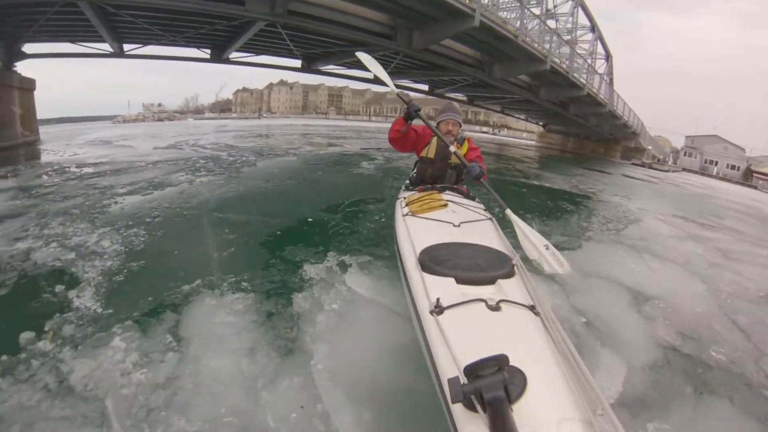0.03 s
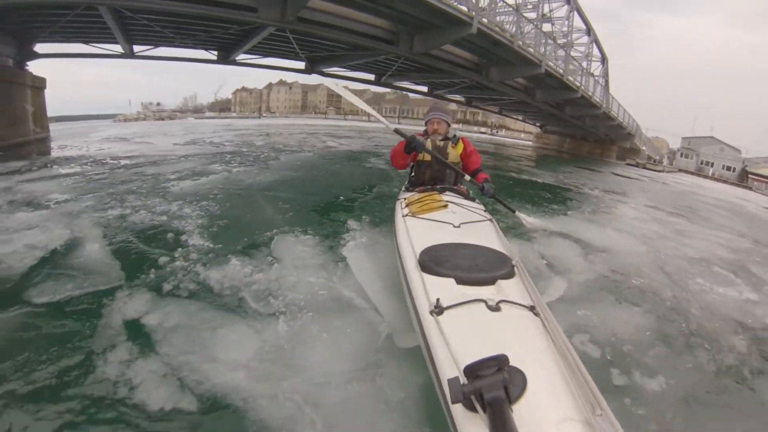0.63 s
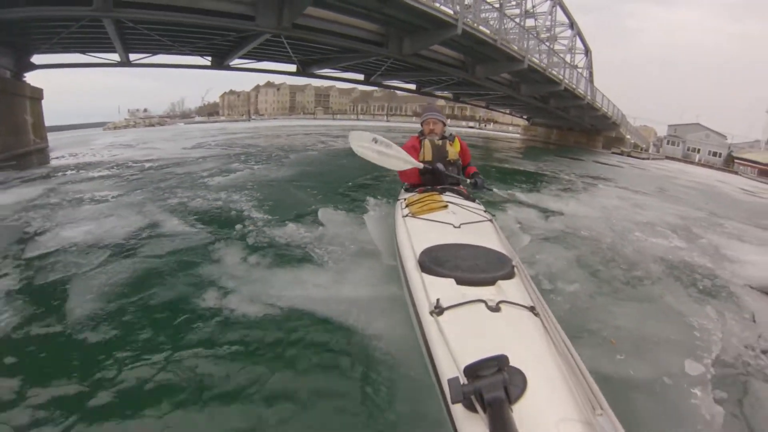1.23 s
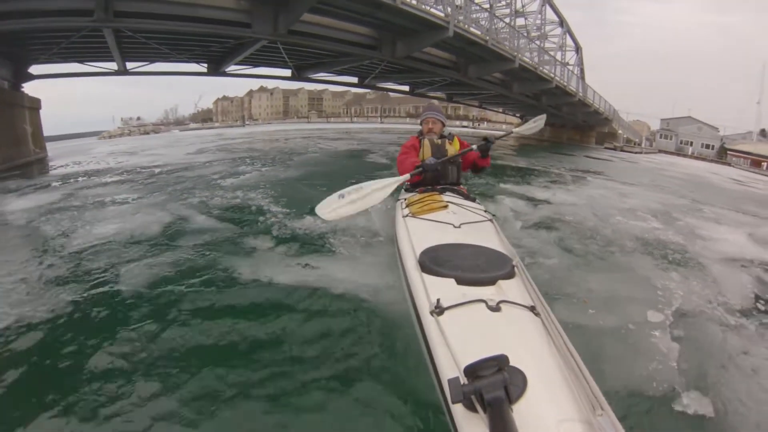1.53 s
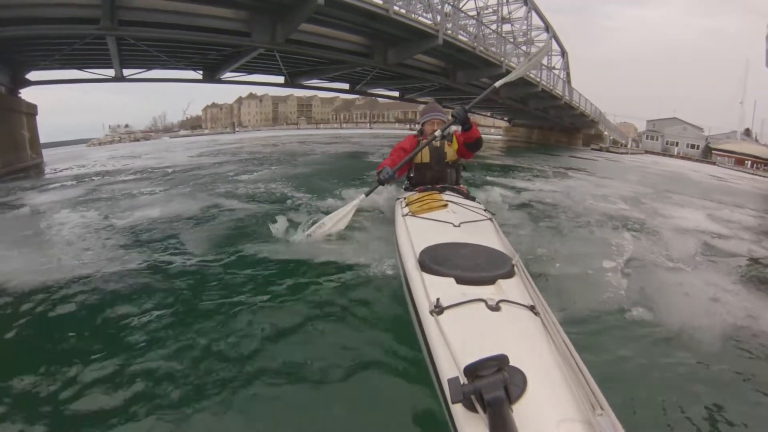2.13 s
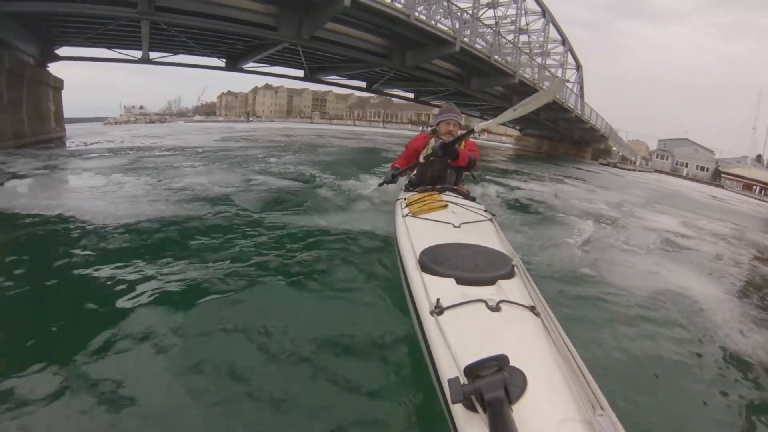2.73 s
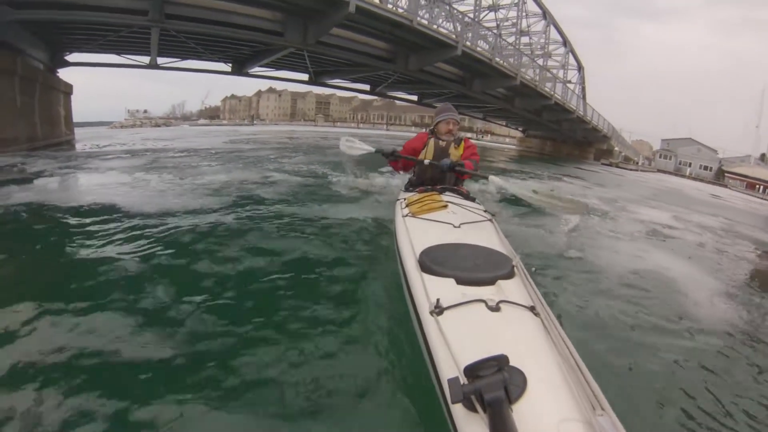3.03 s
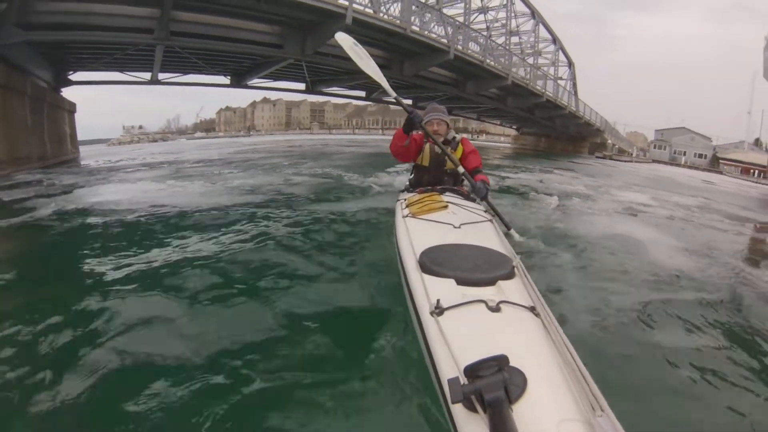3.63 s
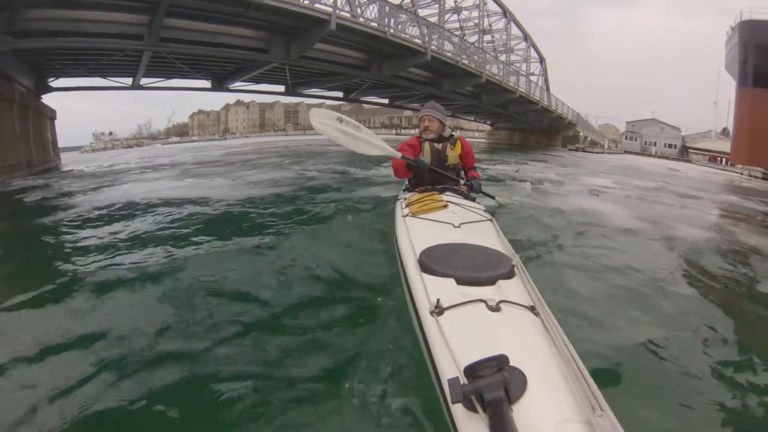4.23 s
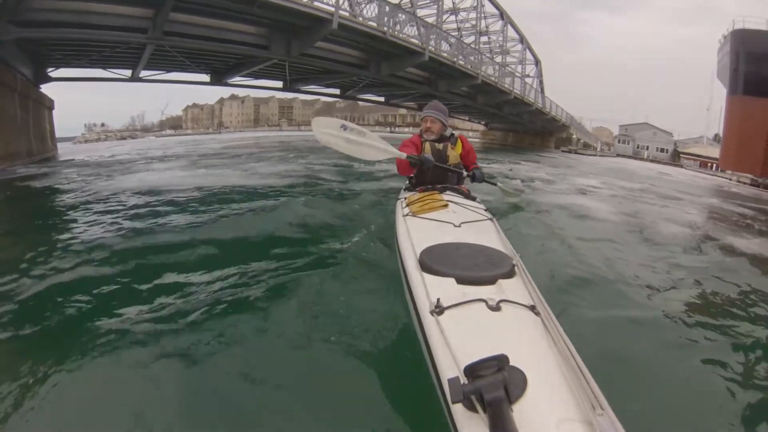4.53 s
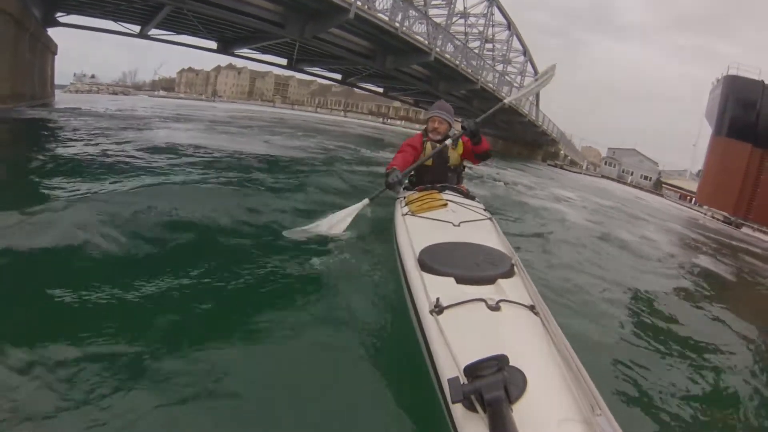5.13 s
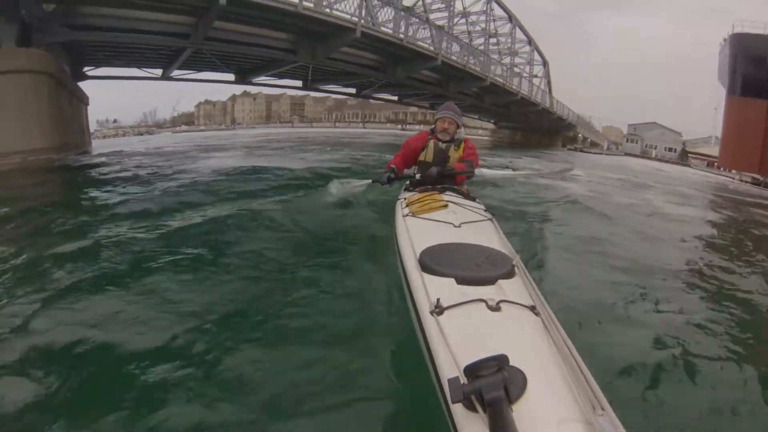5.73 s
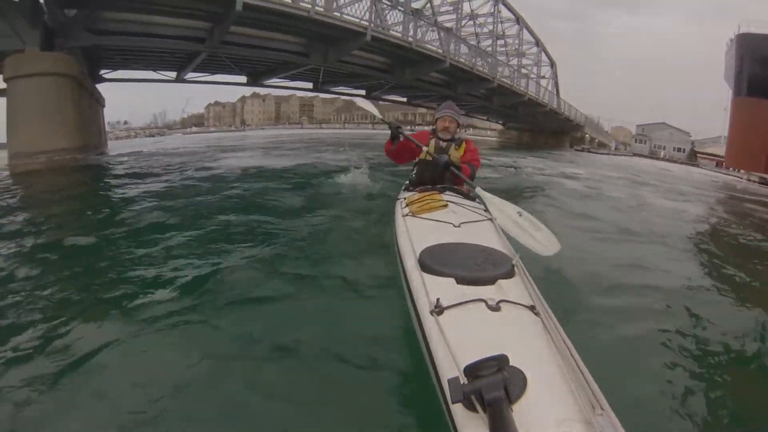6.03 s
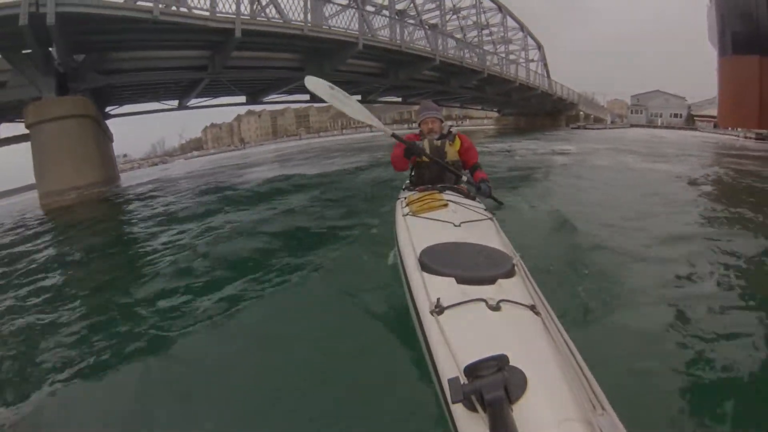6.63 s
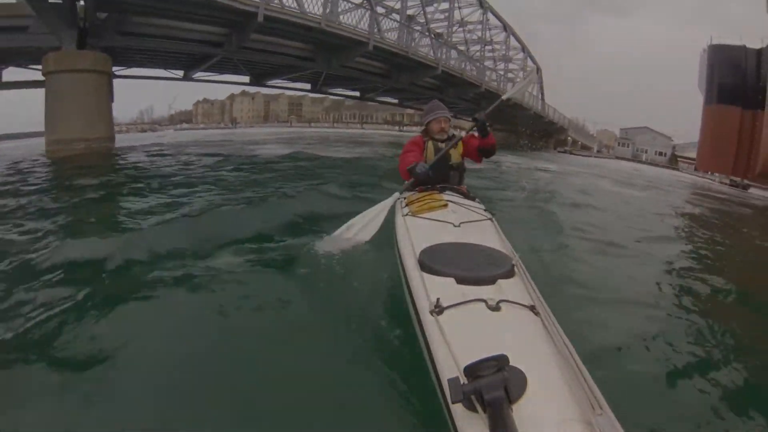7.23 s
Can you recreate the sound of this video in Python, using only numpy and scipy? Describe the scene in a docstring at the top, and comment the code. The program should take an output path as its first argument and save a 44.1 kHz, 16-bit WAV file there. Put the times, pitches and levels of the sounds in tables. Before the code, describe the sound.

A kayak grinds and crunches through slushy ice, then glides into open water with gulps, light splashes and distant gulls.

```python
"""A sea kayak grinds through slush and thin ice under a bridge, then glides into open water.
We ride with a camera on the bow: ice grains, knocks and lapping water come up through the deck and
ring the hull, while the mount sways with a low rumble. Paddle strokes stir up fizz over a faint wash;
past the ice, bubbles gulp and drops patter. Gulls cry in the distance and echo under the bridge."""
import sys
import numpy as np
from scipy import signal
from scipy.fft import rfft, irfft
from scipy.io import wavfile
from scipy.ndimage import uniform_filter1d

SR = 44100
rng = np.random.default_rng(int(sys.argv[2]) if len(sys.argv) > 2 else 0)


def generate_wav(signal):
    """Clip the signal to [-1, 1] and save it as 16-bit WAV at the path in sys.argv[1]."""
    frames = np.transpose(np.atleast_2d(signal))
    scaled = np.clip(frames, -1, 1) * 32767
    pcm = np.round(scaled).astype(np.int16)
    wavfile.write(sys.argv[1], SR, pcm)


N = 329868
TIME = np.arange(N) / SR
FFT_SIZE = 2 ** 19
FREQ = np.maximum(np.arange(FFT_SIZE // 2 + 1) * SR / FFT_SIZE, 1)

# faders for the drag, easing as the ice thins: t/s, push/dB, slosh/dB, grind/dB
DRAG_FADERS = [(0, -35.5, -48.5, -43), (.22, -38, -58.5, -50.5), (.33, -36, -51.5, -47.5),
               (.55, -37.5, -52.5, -46.5), (.95, -34.5, -46.5, -50), (1.25, -40, -60, -57),
               (1.95, -42.5, -64.5, -62.5), (2.25, -43, -65, -58.5), (2.62, -43, -66.5, -65.5),
               (2.918, -38, -62, -60.5), (3.12, -50, -76, -75), (3.68, -49.5, -73.5, -73),
               (3.96, -39, -65.5, -64), (4.28, -47.5, -65.5, -70.5), (4.75, -53, -79, -74),
               (5.3, -55.5, -87, -83.5), (5.7, -67.5, -85.5, -80.5), (6.4, -72.5, -86.5, -76),
               (6.88, -63, -78, -82.5), (7.48, -79.5, -89, -82)]
# passing floes, later wavelets: peak t/s, half length/s, push boost/dB, slosh and grind boost/dB
DRAG_SWELLS = [(0.323, 0.029, 3, 4.5), (0.678, 0.049, 5, 6), (0.803, 0.037, 6, 10), (1.566, 0.018, 6, 2.5),
               (1.74, 0.048, 7, 2), (1.91, .03, 5, 1), (2.04, 0.027, 6, 6), (2.18, 0.027, 4.5, 1),
               (2.318, 0.051, 9, 3.5), (2.784, 0.054, 3.5, 2.5), (3.376, 0.025, 5, 4),
               (3.552, 0.063, 13, 11), (3.781, 0.043, 9, -4), (4.088, 0.047, 8.5, 1),
               (4.202, 0.027, 0.5, 6), (4.881, 0.035, 4, 6.5), (5.003, 0.021, 7, 4), (5.235, 0.16, 7, 6),
               (5.568, 0.033, 10, 7), (6.226, 0.027, 15.5, 4.5), (6.556, 0.041, 10, 13),
               (6.713, 0.087, 12.5, 17), (7.4, 0.039, 9.5, 6)]
# resonances of hull, deck and camera housing: f/Hz, width/Hz, level/dB
HULL_MODES = [(79.4, 28, -12), (106, 49, -9.5), (178.3, 31, 4.5), (234.4, 53, 0.5), (325.7, 65, -8),
              (374, 38, -8.5), (435.2, 50, -11.5), (666, 72, -23.5), (783, 99, -20), (854, 65, -17),
              (943, 57, -17), (1044.5, 72, -19.5), (1192, 160, -24), (1382.4, 118, -12), (1420, 45, -30.5),
              (1620, 59, -27), (1939, 89, -19), (2112, 138, -17), (2190, 64, -19.5), (2792, 160, -34),
              (3330, 300, -38.5), (4090, 370, -48.5), (5060, 460, -58.5), (6790, 1500, -59.5),
              (9300, 2500, -68)]
# upper-range bite of the push, sharper for hard floes than for waves: t/s, gain/dB
PUSH_BITE = [(0, 4.5), (1, 3), (1.9, -2.5), (2.8, -4.5), (3.6, -5), (4.3, 0.5), (5.2, 0.5), (7.48, 2.5)]
# fader for the rocking mount: t/s, level/dB
SWAY_FADER = [(0, -40), (.25, -42), (.37, -27.5), (.52, -43.5), (1.05, -30.5), (1.55, -46.5), (1.76, -34),
              (2.65, -45.5), (3.05, -43), (3.45, -56.5), (3.63, -36.5), (4.3, -54), (4.48, -36.5),
              (4.85, -64.5), (5.08, -39.5), (5.7, -68.5), (6.45, -64), (7.48, -56.5)]
# tone curve of the wash and hiss: f/Hz, relative level/dB
WASH_CURVE = [(30, 3), (100, -5), (200, 0.5), (400, -15.5), (560, -20.5), (1000, -20.5), (1400, -13),
              (1850, -16), (2150, -23.5), (2500, -16), (3600, -34.5), (5000, -32), (7000, -35),
              (12500, -37.5)]
# colour of the fizz: f/Hz, width/Hz, level/dB
FIZZ_MODES = [(3587, 1000, 5.5), (4740, 2500, -3), (6750, 1800, -2), (8770, 1800, -9.5)]
# paddle strokes: peak t/s, level/dB
PADDLE_STROKES = [(.75, -78), (2.12, -84.5), (2.8, -91), (3.58, -78.5), (4.97, -85.5), (6.52, -84),
                  (7.1, -89)]
# ice crumbling and water splashing on the hull: t/s, peak/dB, length/s, low cut/Hz
CRUNCH_CUES = [(0.085, -32, 0.066, 1170), (.507, -29.5, 0.02, 1200), (.550, -29.5, 0.011, 1200),
               (0.756, -26.5, 0.023, 910), (0.78, -23, 0.0053, 700), (0.845, -30.5, 0.019, 750),
               (0.94, -26, 0.023, 1250), (1.293, -40.5, .006, 1200), (1.341, -41, 0.015, 1200),
               (1.614, -36.5, 0.007, 1170), (1.858, -44, 0.018, 1320), (2.166, -45, 0.0075, 1500),
               (2.336, -38.5, 0.011, 965), (3.514, -48, .029, 1300), (3.531, -42.5, .014, 1010),
               (4.037, -43, 0.0082, 3030), (4.05, -31, 0.018, 596), (4.12, -46.5, .0062, 1400),
               (4.401, -51, 0.026, 1000), (5.937, -53.5, 0.019, 1200), (6.661, -46.5, 0.038, 1100),
               (6.72, -38.5, 0.013, 1500)]
# floes and wavelets knocking on the hull: t/s, peak/dB, length/s, brightness/Hz
KNOCK_CUES = [(.32, -25, 0.078, 104.8), (0.775, -20, 0.016, 480), (0.813, -26.5, 0.023, 370),
              (0.841, -23.5, 0.021, 520), (2.773, -25.5, .037, 168), (2.909, -25, 0.053, 265),
              (3.54, -25.5, 0.016, 373), (3.6, -29.5, .055, 99), (4.051, -26.5, 0.029, 550),
              (4.085, -34, 0.024, 189), (5.829, -37, 0.0095, 430), (5.864, -43.5, 0.05, 473),
              (6.722, -38.5, 0.081, 660)]
# sharp snaps of ice: t/s, peak/dB
SNAP_CUES = [(0.344, -23), (0.4032, -9)]
# resonances of a hard snap at the bow: f/Hz, width/Hz, level/dB
SNAP_MODES = [(1550, 430, -3), (2073, 230, 2.5), (2289, 123, -1.5), (3020, 600, -29.5), (4200, 500, -43),
              (5860, 1200, -39), (7580, 300, -39.5)]
# the clearest ticks of ice chips and drops: t/s, peak/dB, centre f/Hz
TICK_CUES = [(.38, -55, 9500), (0.597, -58, 9500), (1.133, -61, 9500), (1.2136, -61, 9600),
             (1.798, -54.5, 6700), (2.28, -65, 6800), (2.87, -70, 6700), (4.09, -60.5, 9300),
             (5.223, -66.5, 9600)]
# nearer cries: t/s, length/s, start f/Hz, end f/Hz, level ahead of the throat/dB, tilt per harmonic/dB
GULL_CUES = [(1.04, 0.077, 1525, 1495, -82.5, 10.5), (1.17, 0.13, 1660, 1440, -68, -3),
             (1.37, 0.12, 1660, 1410, -66, -3.5), (1.951, 0.16, 1660, 1464, -72, -1),
             (2.055, 0.26, 1430, 1330, -71.5, -2), (2.388, .19, 1653, 1295, -63, -6.5),
             (2.525, 0.17, 1630, 1540, -72.5, -0.5), (3.089, 0.096, 1446, 1346, -81.5, 5.5),
             (3.141, 0.11, 1393, 1378, -64.5, -5), (3.241, 0.19, 1720, 1460, -67, -8),
             (3.25, .07, 1597, 1385, -86, 8.5), (3.9, .13, 1620, 1426, -68, -2.5),
             (4.089, .06, 1745, 1550, -68, -14), (4.269, .1, 1410, 1310, -80, 1),
             (4.604, 0.085, 1560, 1530, -76.5, -1), (4.791, 0.08, 1550, 1390, -68.5, -8),
             (5.139, .12, 1785, 1545, -73.5, -2.5), (5.247, .145, 1400, 1252, -68.5, -7),
             (5.331, 0.1, 1420, 1300, -81.5, 4), (5.439, 0.075, 2380, 2190, -69.5, 0),
             (5.51, 0.068, 1564, 1496, -70.5, -5), (5.86, 0.094, 1595, 1480, -78.5, 1),
             (6.02, .075, 1630, 1530, -77.5, 0), (6.214, 0.2, 1364, 1310, -81.5, 4),
             (6.264, .085, 1780, 1680, -74, -6), (6.33, 0.14, 2350, 2060, -75, -1.5),
             (7.069, 0.19, 1584, 1380, -71.5, -3), (7.18, .11, 1704, 1530, -76.5, 0),
             (7.36, .1, 1475, 1297, -83.5, 3)]
# resonances of a gull's throat: f/Hz, gain/dB
THROAT_CURVE = [(1300, -8.5), (1550, 0.5), (1800, -4), (2300, -3.5), (2700, -12), (3150, -8), (3600, -13),
                (4150, -10), (4600, -17), (5200, -31), (7000, -39)]
# featured gulps of air under the bow, bubbles and drips: t/s, f/Hz, level/dB, t60/s
BUBBLE_CUES = [(2.772, 167, -34, 0.2), (4.05, 234, -18.5, .11), (4.096, 177, -29.5, 0.2),
               (4.188, 908, -39, 0.063), (4.189, 2140, -46, .048), (4.334, 1036, -46, 0.049),
               (4.399, 630, -57.5, 0.12), (4.673, 1940, -40, 0.026), (5.83, 234.4, -38.5, .1),
               (5.848, 436, -39.5, 0.086), (6.177, 1405, -53, .09), (6.195, 1010, -58, 0.11),
               (6.519, 2000, -50, 0.028), (6.545, 798, -56, .17), (6.596, 1374, -50, 0.089),
               (6.577, 2050, -51, 0.03), (6.644, 2110, -47, 0.069), (6.699, 2780, -53, .04),
               (6.723, 2820, -52, 0.026), (6.765, 744, -51.5, .06), (7.395, 802, -61, .088)]

ICE_ENDS_S = 3.4  # the bow leaves the ice
OPEN_WATER_S = N / SR - ICE_ENDS_S
HEAVY_GRIND_DB = -50.5  # grind fader in thick slush; chips and fizz ride against it


def undb(db):
    """Decibels to gain."""
    return 10 ** (np.asarray(db) / 20)


def rms(x):
    """Average signal strength."""
    return np.sqrt(np.mean(x ** 2))


def shape(x, response):
    """Pass a sound through a frequency response."""
    return irfft(rfft(x, FFT_SIZE) * response)[:N]


def band(x, lo_hz, hi_hz, order=3):
    """Causal band-pass."""
    return signal.sosfilt(signal.butter(order, [lo_hz, hi_hz], "band", fs=SR, output="sos"), x)


def ring(modes, size=8192):
    """Impulse response of a body with steep-sided resonances."""
    hz = np.arange(size // 2 + 1) * SR / size
    power = sum(undb(2 * db) / (1 + (2 * (hz - f) / width) ** 2) ** 2 for f, width, db in modes)
    # minimum phase puts the attack first and the ring after it
    cepstrum = irfft(np.log(power) / 2)
    cepstrum[1:size // 2] *= 2
    cepstrum[size // 2 + 1:] = 0
    return irfft(np.exp(rfft(cepstrum)))


def add(out, s, x):
    """Mix a sound in at time s."""
    i = max(int(s * SR), 0)
    out[i:i + len(x)] += x[:max(N - i, 0)]


def wander(rate):
    """Smooth random modulator with about `rate` moves a second; RMS 1."""
    hold = max(int(SR / rate), 2)
    steps = np.repeat(rng.standard_normal(N // hold + 1), hold)
    x = uniform_filter1d(uniform_filter1d(steps, hold), hold)
    return x[:N] / rms(x)


def grains(rate, scatter_db, clump_db, clump_hz):
    """Random impulses of unequal size, swelling and ebbing in clumps."""
    sizes = undb(scatter_db * np.minimum(rng.exponential(size=N), 4))
    impulses = (rng.random(N) < rate / SR) * sizes * rng.choice([-1, 1], N)
    return impulses * undb(clump_db * wander(clump_hz))


def steady(x, lo_hz, hi_hz, span_s=0.22):
    """Ride a texture to unit level in one band, keeping only its fast flicker."""
    power = uniform_filter1d(band(x, lo_hz, hi_hz) ** 2, int(span_s * SR))
    return x / np.sqrt(uniform_filter1d(power, int(span_s * SR / 2)) + 1e-18)


def drag():
    """Push, slosh and grind faders: the slow drag, with a swell for each passing floe or wavelet."""
    times, *faders = np.transpose(DRAG_FADERS)
    push_db, slosh_db, grind_db = (np.interp(TIME, times, fader) for fader in faders)
    for peak_s, half_s, push_boost_db, scrape_boost_db in DRAG_SWELLS:
        swell = np.exp(-((TIME - peak_s) / half_s) ** 2)
        push_db += push_boost_db * swell
        slosh_db += scrape_boost_db * swell
        grind_db += scrape_boost_db * swell
    return push_db, slosh_db, grind_db


def slush(hull, push_db, slosh_db, grind_db):
    """Soft shoves, wet slush and hard ice grains each excite their own range of the hull."""
    def rub(force, lo_hz, hi_hz):
        return band(signal.fftconvolve(force, hull)[:N], lo_hz, hi_hz, order=4)
    shoves = rub(grains(rate=420, scatter_db=0.5, clump_db=2, clump_hz=25), 48, 560)
    upper = shape(shoves, 1 / (1 + (290 / FREQ) ** 6))
    bite = undb(np.interp(TIME, *np.transpose(PUSH_BITE)))
    shoves = steady(shoves + upper * (bite - 1), 130, 520, span_s=0.07)
    wet = rub(grains(rate=1300, scatter_db=1.5, clump_db=2.5, clump_hz=50), 560, 1226)
    wet = steady(wet, 650, 1150)
    # ice catches and slips, so its grains come in clumps
    ice = rub(grains(rate=2600, scatter_db=1.5, clump_db=2, clump_hz=70), 1232, 13000)
    ice = steady(ice, 1850, 2350)
    return shoves * undb(push_db) + wet * undb(slosh_db - 3.5) + ice * undb(grind_db - 2.5)


def mount_rumble():
    """The camera mount rocks at its own low resonance."""
    resonance = 1 / (1 + ((FREQ - 29.5) / 4.8) ** 2)
    shoulder = undb(-30) / (1 + ((FREQ - 50) / 22) ** 2)
    sway = shape(rng.standard_normal(N), resonance + shoulder)
    sway_db = np.interp(TIME, *np.transpose(SWAY_FADER))
    return steady(sway, 16, 55, span_s=0.94) * undb(sway_db - 0.57)


def water_wash(level_db=-69):
    """The bed: a faint wash of open water under a smooth hiss."""
    hz, db = np.transpose(WASH_CURVE)
    wash = shape(rng.standard_normal(N), undb(np.interp(np.log(FREQ), np.log(hz), db)))
    return wash / rms(wash) * undb(level_db + 0.5 * wander(5))


def fizz(grind_db, slush_db=-79, rise_s=0.09, fade_s=0.24):
    """Tiny bursting bubbles and falling slush, airborne, at each paddle stroke and where ice grinds."""
    pops = grains(rate=3000, scatter_db=3.5, clump_db=1.6, clump_hz=60)
    froth = signal.fftconvolve(pops, ring(FIZZ_MODES))[:N]
    in_ice = np.clip(1 + ICE_ENDS_S - TIME, 0, 1)
    power = in_ice * undb(slush_db + 0.33 * (grind_db - HEAVY_GRIND_DB)) ** 2
    for s, db in PADDLE_STROKES:
        stroke = np.exp(np.minimum((TIME - s) / rise_s, (s - TIME) / fade_s))
        power += (undb(db) * stroke) ** 2
    return froth / rms(froth) * np.sqrt(power)


def tick(hz):
    """One tiny, bright burst of noise; peak 1."""
    t = TIME[:600]
    burst = rng.standard_normal(len(t)) * t * np.exp(-t / 0.0009)
    x = band(burst, 0.83 * hz, 1.14 * hz)
    return x / np.abs(x).max()


def ice_chips(grind_db, count=70, spread_db=10.5, lo_hz=6500, hi_hz=10360):
    """Ice chips tick against the deck, fewer and fainter as the ice thins."""
    out = np.zeros(N)
    for when, pitch, softness in rng.random((count, 3)):
        s = ICE_ENDS_S * (1 - np.sqrt(1 - when))
        loudest_db = -64 + 0.53 * (np.interp(s, TIME, grind_db) - HEAVY_GRIND_DB)
        db = loudest_db - spread_db * np.sqrt(softness)
        add(out, s, undb(db) * tick(lo_hz + pitch * (hi_hz - lo_hz)))
    return out


def hull_hit(hull, length_s, lo_hz, hi_hz, attack):
    """A first break and a fading cluster of smaller ones ring the hull; peak 1."""
    t = TIME[:8192]
    force = rng.standard_normal(len(t)) * np.exp(-(t / length_s) ** 2) / np.sqrt(length_s * SR)
    force[0] += attack
    x = band(signal.fftconvolve(force, hull), lo_hz, hi_hz, order=2)
    return x / np.abs(x).max()


def crunches(hull):
    """Crumbling ice and splashing water ring the bright end of the hull."""
    out = np.zeros(N)
    for s, db, length_s, lo_hz in CRUNCH_CUES:
        add(out, s, undb(db) * hull_hit(hull, length_s, lo_hz, hi_hz=5500, attack=0.5))
    return out


def knocks(hull):
    """Floes and wavelets bump the hull and bring out its hollow low end."""
    out = np.zeros(N)
    for s, db, length_s, hz in KNOCK_CUES:
        add(out, s, undb(db) * hull_hit(hull, length_s, 0.54 * hz, 1.33 * hz, attack=0.7))
    return out


def ice_snaps():
    """Ice snaps hard at the bow, the highs trailing a little behind the lows."""
    out = np.zeros(N)
    snap = band(ring(SNAP_MODES), 1150, 13000, order=2)
    treble_lag = np.exp(-1j * np.pi * 0.001634 * FREQ ** 2 / (FREQ + 2500))
    snap = shape(snap, treble_lag)[:len(snap)]
    for s, db in SNAP_CUES:
        add(out, s, undb(db) * snap / np.abs(snap).max())
    return out


def clear_ticks():
    """Single chips and drops land as pinpoints of treble."""
    out = np.zeros(N)
    for s, db, hz in TICK_CUES:
        add(out, s, undb(db) * tick(hz))
    return out


def gull_cry(length_s, pitches_hz, level_db, tilt_db, quaver):
    """A hoarse tone bends through three pitches; the throat and the tilt weigh its three harmonics."""
    throat_hz, throat_db = np.transpose(THROAT_CURVE)
    harmonics = np.arange(1, 4)
    colour_db = np.interp(np.log(pitches_hz[1] * harmonics), np.log(throat_hz), throat_db)
    levels_db = level_db + colour_db + tilt_db * (harmonics - 1)
    progress = np.linspace(0, 1, int(length_s * SR))
    wobble, flutter = (quaver[i:i + len(progress)] for i in rng.integers(0, N - SR, 2))
    bend_hz = np.polyval(np.polyfit([0, 0.5, 1], pitches_hz, 2), progress)
    phase = 2 * np.pi * np.cumsum(bend_hz * (1 + 0.007 * wobble)) / SR
    tone = sum(undb(db) * np.sin(k * phase) for k, db in zip(harmonics, levels_db))
    swell = np.minimum(progress / 0.11, 1) * np.minimum((1 - progress) / 0.15, 1)
    return np.sqrt(2) * tone * undb(2.6 * flutter - 0.4) * swell


def gulls(flock_cries=64, echo_t60_s=0.63, predelay_s=0.025):
    """The nearer gulls, a fainter flock behind them, and their echo under the bridge."""
    near, flock, quaver = np.zeros(N), np.zeros(N), wander(260)
    for s, length_s, start_hz, end_hz, db, tilt_db in GULL_CUES:
        middle_hz = start_hz + 0.7 * (end_hz - start_hz)  # most of the fall comes early
        add(near, s, gull_cry(length_s, [start_hz, middle_hz, end_hz], db, tilt_db, quaver))
    for when, pitch, length, softness, bend in rng.random((flock_cries, 5)):
        # some cries arch over, others drop and level off
        pitches_hz = (1320 + 330 * pitch) * np.array([1 + 0.11 * bend, 1, 0.92 + 0.06 * bend])
        db = -74.5 - 7.5 * softness
        cry = gull_cry(0.079 + 0.058 * length, pitches_hz, db, tilt_db=-4.5, quaver=quaver)
        add(flock, when * N / SR, cry)
    near *= undb(2.5 * wander(35))  # the cries come and go over the water
    cries = near + flock
    t = TIME[:SR]
    tail = rng.standard_normal(SR) * np.exp(-np.log(1000) * t / echo_t60_s) * (t > predelay_s)
    echo = signal.fftconvolve(cries, tail / np.linalg.norm(tail))[:N]
    return cries + undb(-10.5) * echo


def bubble(hz, t60):
    """A trapped bubble swells, rings and rises a little in pitch as it nears the surface."""
    t = TIME[:8192]
    glide_hz = hz * (1 + 0.14 * np.minimum(t / t60, 1))
    phase = 2 * np.pi * np.cumsum(glide_hz) / SR
    swell = 1 - np.exp(-(t / 0.0022) ** 2)
    return np.sin(phase) * np.exp(-np.log(1000) * t / t60) * swell


def bubbles(slosh_db, count=170):
    """Featured gulps and drips, and many small bubbles where open water sloshes along the bow."""
    out = np.zeros(N)
    for s, hz, db, t60 in BUBBLE_CUES:
        add(out, s, undb(db) * bubble(hz, t60))
    for when, pitch, softness in rng.random((count, 3)):
        s = ICE_ENDS_S + when * OPEN_WATER_S
        db = np.interp(s, TIME, slosh_db) + 14.5 - 11 * softness - 9 * pitch
        add(out, s, undb(db) * bubble(hz=750 * 4.3 ** pitch, t60=0.033 * 0.5 ** pitch))
    return out


def splashes(hull, grind_db, count=30, over_grind_db=17.5, spread_db=10):
    """Drops and last crumbs of ice patter on the bow in open water."""
    out = np.zeros(N)
    for when, softness, pitch in rng.random((count, 3)):
        s = ICE_ENDS_S + when * OPEN_WATER_S
        db = np.interp(s, TIME, grind_db) + over_grind_db - spread_db * softness
        drop = hull_hit(hull, length_s=0.004, lo_hz=700 * 4 ** pitch, hi_hz=5500, attack=0.56)
        add(out, s, undb(db) * drop)
    return out


def scene():
    """Mono mix: the boat up close, fizz around it, gulls and wash behind."""
    push_db, slosh_db, grind_db = drag()
    hull = ring(HULL_MODES)
    body = slush(hull, push_db, slosh_db, grind_db) + mount_rumble()
    hits = crunches(hull) + knocks(hull) + ice_snaps() + clear_ticks()
    sprinkles = bubbles(slosh_db) + ice_chips(grind_db) + splashes(hull, grind_db)
    return (body + hits + sprinkles + fizz(grind_db) + gulls() + water_wash())[None]


def record(dry):
    """The camera cuts the top end steeply."""
    top_hz = 12900
    return signal.sosfilt(signal.ellip(8, 0.2, 70, top_hz, fs=SR, output="sos"), dry)


dry = scene()
out = record(dry)
generate_wav(out)
```